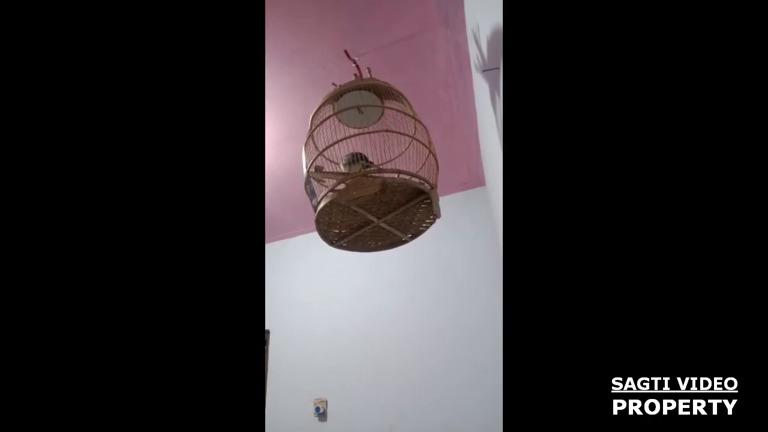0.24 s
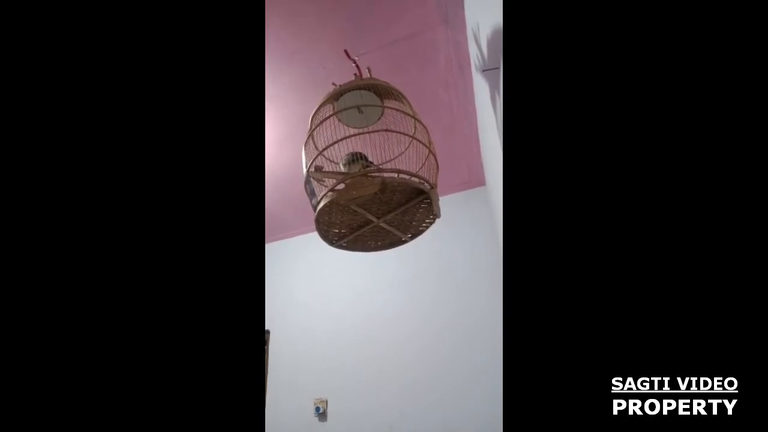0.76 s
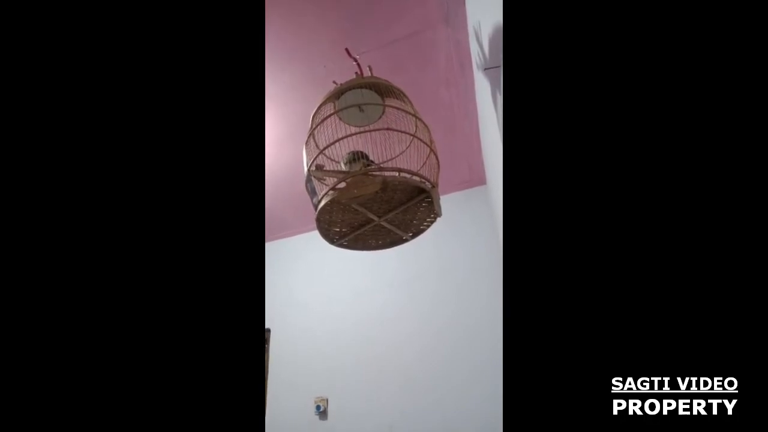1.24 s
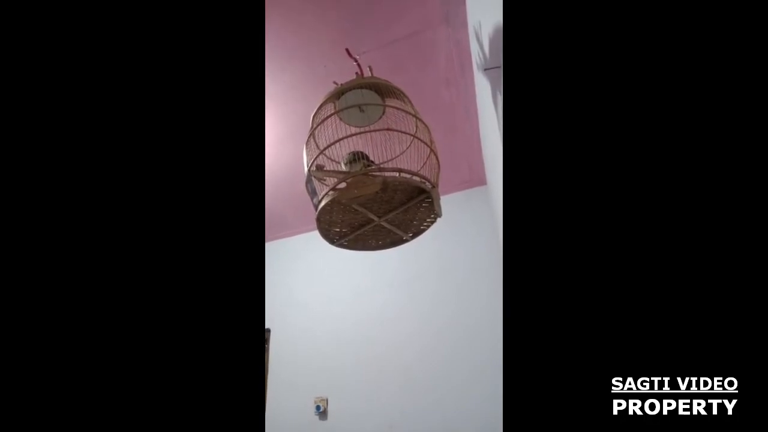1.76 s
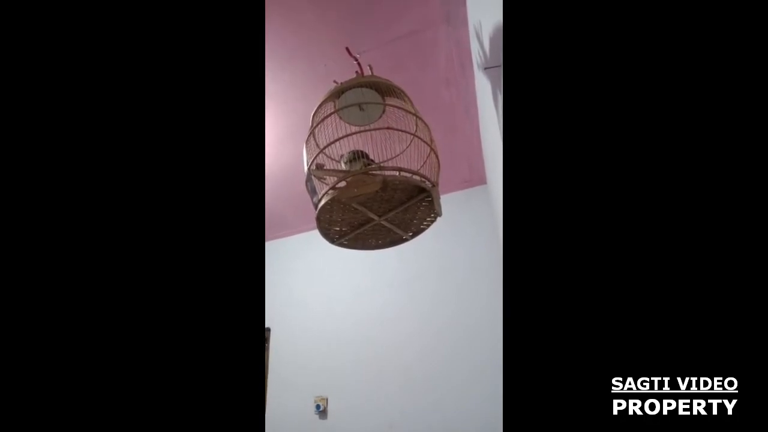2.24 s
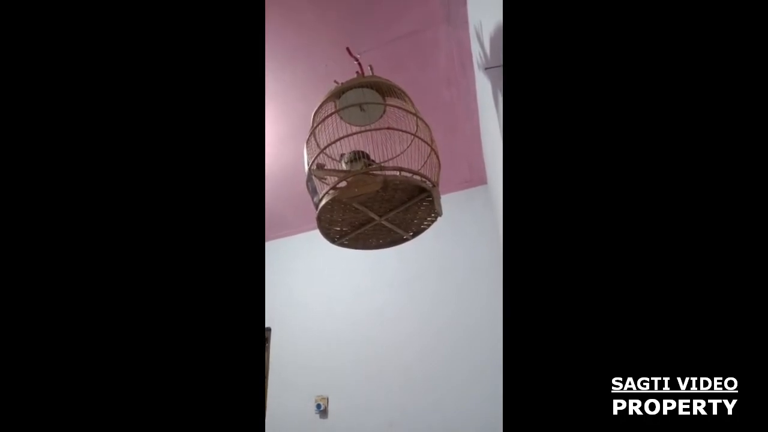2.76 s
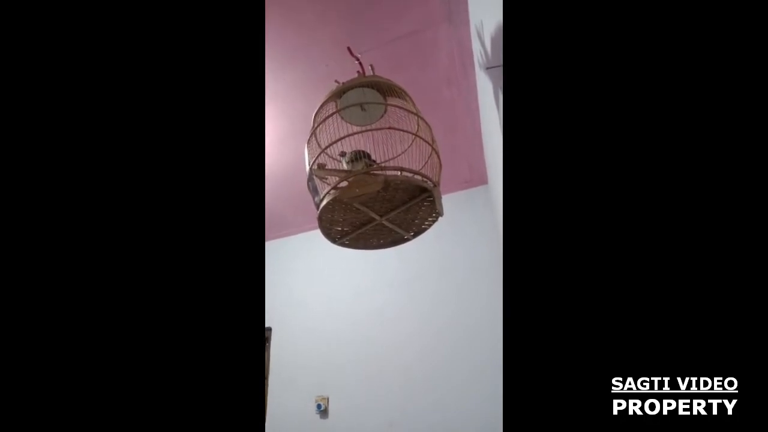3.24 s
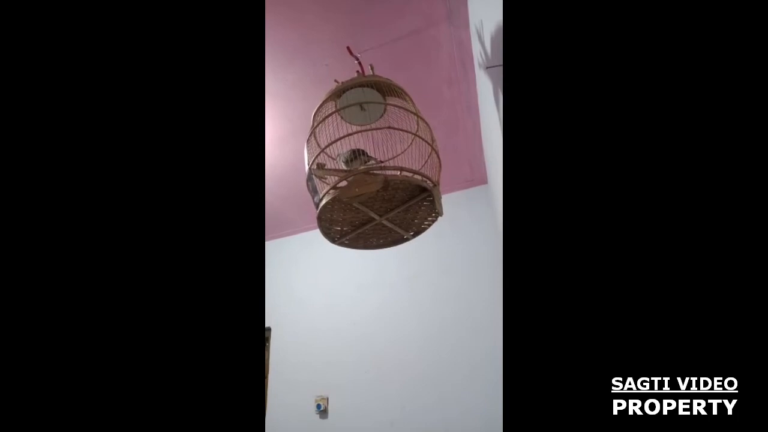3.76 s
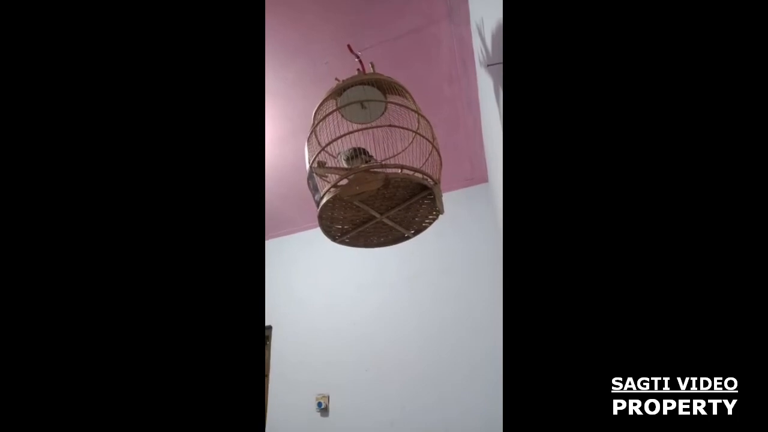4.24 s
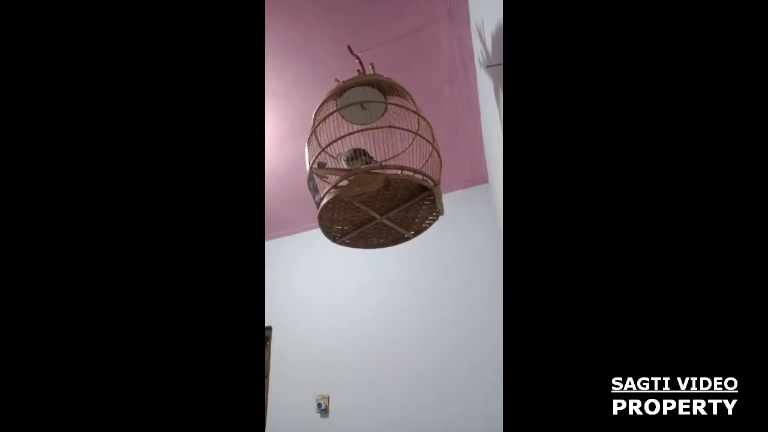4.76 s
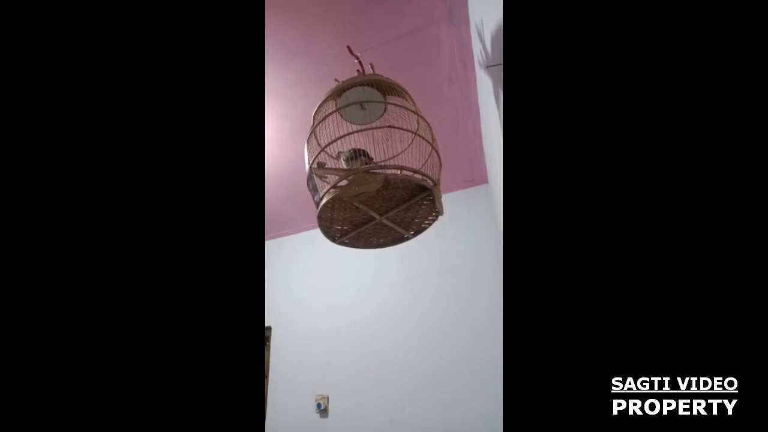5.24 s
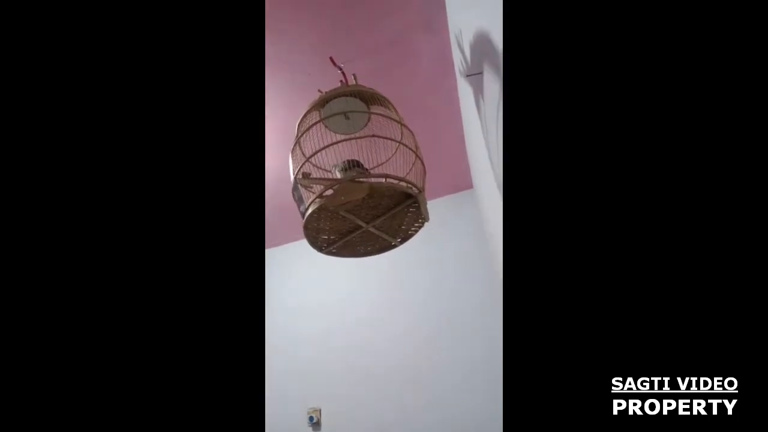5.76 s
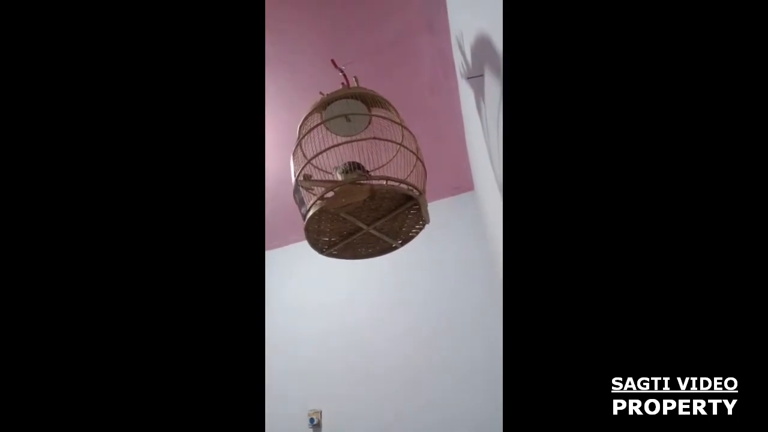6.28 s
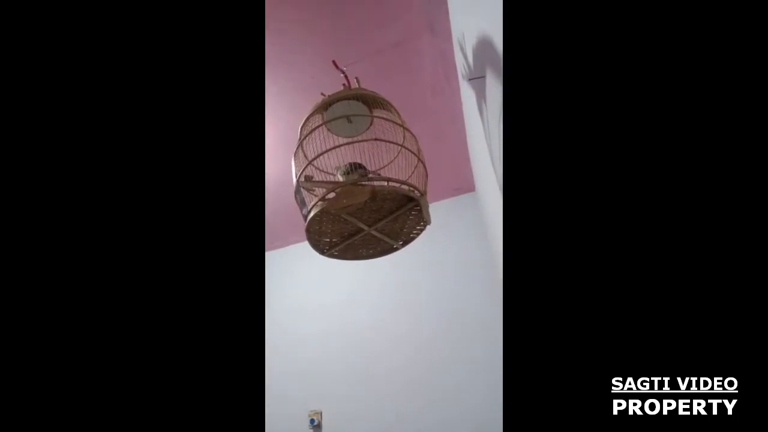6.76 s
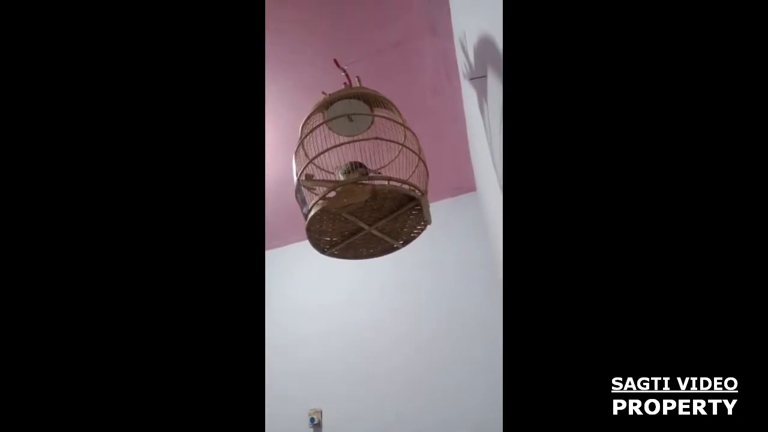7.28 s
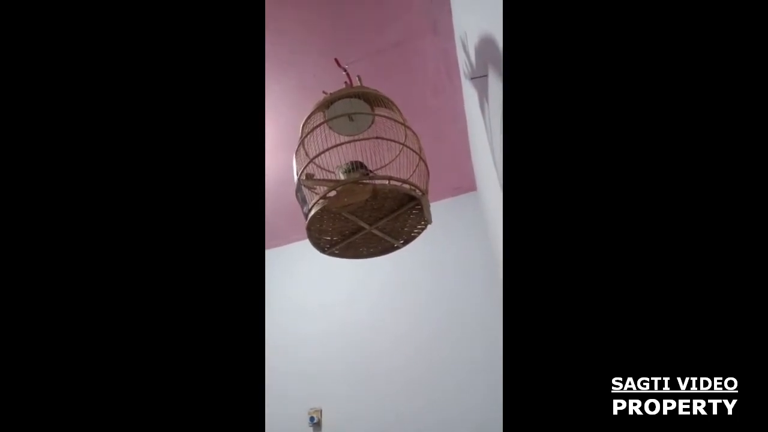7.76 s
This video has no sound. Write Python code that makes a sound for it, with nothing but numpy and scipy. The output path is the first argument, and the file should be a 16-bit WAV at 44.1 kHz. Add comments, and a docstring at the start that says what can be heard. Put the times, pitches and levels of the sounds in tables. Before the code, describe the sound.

In a bare room with ringing walls, a caged dove rustles and gives one quiet coo. A few seconds later it calls loudly with a quick, fluttering roll that trails into softer notes, then gives a shorter loud rolling coo near the end. Small ticks and soft knocks come from the cane cage. The microphone also picks up a faint steady hiss and low room rumble.

```python
"""A bare, echoing room: a dove in a hanging cane cage coos three times.
Slack syrinx membranes rattle and rasp, then snap tight, so each note swoops up into a nearly pure
tone, filtered by the swollen throat. The two loud coos roll in quick notes; the second side of the
syrinx adds a lower, fluttering voice. The bird ticks, rustles and bumps on its perch over a faint
hiss, a low rumble and a far tone that sinks and fades."""
import sys
import numpy as np
from scipy import signal
from scipy.fft import rfft, irfft, next_fast_len
from scipy.io import wavfile
from scipy.ndimage import uniform_filter1d, minimum_filter1d

SR = 44100
rng = np.random.default_rng(int(sys.argv[2]) if len(sys.argv) > 2 else 0)


def digitize_waveform(pressure):
    """Quantize a signal to 16-bit integers and store it at the path in sys.argv[1].

    Rows of a 2-D input are taken as channels; values are limited to [-1, 1].
    """
    field = np.atleast_2d(pressure).T
    bounded = np.clip(field, -1, 1)
    quanta = np.round(bounded * 32767).astype(np.int16)
    wavfile.write(sys.argv[1], SR, quanta)


N = 353417


# Drawn-out notes: catch t/s, swoop/s, length/s, top f/Hz, sag/Hz, effort/dB, fade/dB
LONG_NOTES = [(.695, 0.1, 0.25, 1168, 167, -21.5, -9), (1.133, .028, 0.06, 1013, 43, -24.5, -16),
              (1.273, 0.028, .13, 1085, 27, -24, -0.5), (3.779, .042, 0.16, 1324, 75.5, -2, 7),
              (4.429, 0.024, 0.085, 1282, 52, -6, -8), (4.542, 0.017, .235, 1157, 160, -24, -7.5),
              (4.869, .025, 0.061, 927, 16, -28, -9.5), (5.002, 0.028, 0.14, 1047, 37, -24.5, -15),
              (6.823, .036, .17, 1305, 62, -3, -4), (7.341, 0.018, 0.073, 1254, 14, -3, -21.5)]

def coos(slack_hz=492.4, rattle_hz=766.6, snap_share=0.4, crest_s=0.06):
    """Membranes start slack, rattle and snap tight; past the crest, pitch sags before effort."""
    out = np.zeros(N)
    for s, swoop_s, length, top_hz, sag_hz, effort_db, fade_db in LONG_NOTES:
        t = np.linspace(0, length, 13)
        crest = min(crest_s, length / 2)
        to_crest = np.clip(1 - t / crest, 0, 1)
        past_crest = np.clip((t - crest) / (length - crest), 0, 1)
        hz = top_hz * (1 - 0.055 * to_crest ** 2) - sag_hz * past_crest ** 1.5
        db = effort_db - 0.5 * to_crest + fade_db * past_crest ** 2.6
        swoop = [(s - swoop_s, slack_hz, effort_db - 22),
                 (s - snap_share * swoop_s, rattle_hz, effort_db - 9.5)]
        contour = swoop + list(zip(s + t, hz, db))
        add(out, *syrinx(contour, flutter=0.03, slack_jitter=0.06, rasp_db=-45.5,
                         slack_rasp_db=-6 + 0.34 * effort_db, overtone_db=-3))
    return out


# Quick notes: catch t/s, length/s, top f/Hz, effort/dB
ROLL_NOTES = [(3.957, 0.02, 1224, -1), (4.019, 0.04, 1185, -6.5), (4.089, 0.021, 1170, -6),
              (4.163, 0.029, 1198, -3.5), (4.259, 0.046, 1233, -3), (7.006, 0.033, 1243, -5.5),
              (7.068, 0.027, 1186, -5), (7.142, 0.021, 1177, -6), (7.227, 0.028, 1203, -4)]

def roll(swoop_s=0.017, slack_hz=714, flat_ratio=0.978):
    """Each quick note swoops up from slack and makes one small, dying arch."""
    out = np.zeros(N)
    for s, length, top_hz, effort_db in ROLL_NOTES:
        contour = [(s - swoop_s, slack_hz, effort_db - 18.5),
                   (s, top_hz * flat_ratio, effort_db),
                   (s + length / 2, top_hz, effort_db - 2),
                   (s + length, top_hz * flat_ratio, effort_db - 12)]
        add(out, *syrinx(contour, flutter=0.033, slack_jitter=0.05, rasp_db=-41,
                         slack_rasp_db=-6, overtone_db=-3.5))
    return out


# Lower voice: t/s, length/s, f/Hz, glide/Hz, effort/dB, fade/dB
LOW_NOTES = [(.672, 0.14, 870.4, 7, -11, -26), (.925, 0.12, 874, -115, -17.5, -5),
             (1.12, 0.056, 792, 84, -18.5, -5.5), (1.255, 0.083, 817, 40, -15, -31),
             (3.778, 0.11, 1010, 41, -14.5, -23), (4.42, .016, 987, 80, -8, -18),
             (4.48, 0.038, 856, 4, -13.5, -11), (4.71, .13, 876.5, -98.5, -22, 2),
             (4.872, 0.044, 857.4, -17, -17, -21), (4.972, 0.064, 800.3, 12.5, -21.5, -7.5),
             (6.814, 0.016, 964, -13.5, -8.5, -6.5), (6.836, 0.089, 866, -11.5, -13, -19.5),
             (7.075, .17, 870, -12.5, -22.5, 1.5), (7.338, 0.044, 955, -95, -12, -13)]

def lower_voice(attack_s=0.014, flat_ratio=0.973):
    """The second side of the syrinx starts weak and flat, then glides straight, fluttering."""
    out = np.zeros(N)
    for s, length, hz, glide_hz, effort_db, fade_db in LOW_NOTES:
        contour = [(s - attack_s, hz * flat_ratio, effort_db - 12.5),
                   (s, hz, effort_db),
                   (s + length, hz + glide_hz, effort_db + fade_db)]
        add(out, *syrinx(contour, flutter=0.35, slack_jitter=0.038, rasp_db=-38.5,
                         slack_rasp_db=-35, overtone_db=-22.5))
    return out


# Passband of the swollen crop and throat: f/Hz, gain/dB
THROAT = [(200, -32.5), (320, -17.5), (480, -27.5), (720, -11.5), (900, -1), (1300, -3.5), (1480, -5),
          (1850, -16.5), (2150, -19), (2550, -17.5), (3100, -14.5), (3800, -20.5), (4200, -37),
          (4900, -41.5), (6300, -40.5), (7400, -28), (8300, -45), (9100, -40.5), (12000, -49.5)]

def syrinx(contour, flutter, slack_jitter, rasp_db, slack_rasp_db, overtone_db,
           clear_hz=1080, slack_hz=700, fade_s=0.004):
    """Membranes rasp when slack, sing when tight. Contour: t/s, f/Hz, effort/dB. Gives start, sound."""
    s, pitch, effort = np.transpose(contour)
    size = SR // 2
    t = np.arange(s[0], s[-1] + fade_s, 1 / SR)[:size]
    hz = np.interp(t, s, pitch)
    effort_db = np.interp(t, s, effort)
    slack = np.clip((clear_hz - hz) / (clear_hz - slack_hz), 0, 1)
    hz *= 1 + (0.0015 + slack_jitter * slack) * wander(size, 190)[:len(t)]
    phase = 2 * np.pi * np.cumsum(hz) / SR
    tone = gain_of(read(THROAT, hz)) * np.sin(phase)
    for k in range(2, 11):
        dull_db = -26 * slack * (k > 2)
        harmonic_db = read(THROAT, k * hz) + overtone_db - 8 * np.log2(k) + dull_db
        tone += gain_of(harmonic_db) * np.sin(k * phase)
    weak = np.clip((-16 - effort_db) / 10, 0, 1)  # weak drive swings unevenly
    tone *= 1 + (flutter + 0.066 * weak) * wander(size, 170)[:len(t)]
    air_spectrum = [(f, db - 16 * np.log2(max(f / 1600, 1))) for f, db in THROAT]
    air = noise(air_spectrum, size)[:len(t)]  # rushing past the membranes
    rasp = air * (gain_of(rasp_db) + gain_of(slack_rasp_db) * slack)
    edge_s = np.minimum(t - t[0], t[-1] - t)
    fade = np.sin(np.pi / 2 * np.clip(edge_s / fade_s, 0, 1)) ** 2
    return s[0], gain_of(effort_db) * fade * (tone + rasp)


# Brushes on the cane: t/s, relative level/dB, decay/s
RUSTLES = [(.233, -44, .012), (.332, -54, .015), (.426, -45.5, .016), (.588, -58, 0.011), (.835, -51, .012),
           (.861, -44.5, .025), (3.682, -49.5, .008), (7.008, -52.5, .008), (7.283, -43, .008)]
# Rustle spectrum: f/Hz, level/dB
RUSTLE_SPECTRUM = [(300, -20.5), (1500, -5), (3000, 2), (4200, -9.5), (5600, -25), (8300, -5), (11000, -18),
                   (15000, -14)]

def rustles():
    """Feathers and claws brush the cane."""
    out = np.zeros(N)
    for s, db, decay_s in RUSTLES:
        add(out, s, gain_of(db) * burst(RUSTLE_SPECTRUM, decay_s, rise_s=0.00034))
    return out


# Perch contacts: t/s, relative level/dB, decay/s, centre f/Hz, width/octaves
BUMPS = [(.43, -44, 0.024, 413, 0.47), (.427, -67, 0.0084, 2800, 0.56), (.859, -34.5, 0.01, 2550, 0.34),
         (1.039, -45, 0.048, 145, 0.19), (3.689, -47.5, 0.049, 1000, 0.58),
         (4.595, -38.5, 0.016, 360, 0.99), (4.753, -42.5, 0.046, 340, 0.99),
         (4.794, -51.5, 0.0099, 250, 0.98), (5.179, -45, 0.013, 320, 0.34),
         (5.184, -42.5, 0.024, 2350, 0.11), (6.743, -44.5, 0.061, 1000, 0.47)]

def perch_bumps():
    """The bird knocks and scrapes softly on its perch, one noise band per contact."""
    out = np.zeros(N)
    for s, db, decay_s, hz, octaves in BUMPS:
        band = [(hz * 2 ** (k * octaves), -4 * k * k) for k in np.arange(-4, 5)]
        add(out, s, gain_of(db) * burst(band, decay_s, rise_s=0.0012))
    return out


# Cage ticks: t/s, relative level/dB, f/Hz, length/s
TICKS = [(3.484, -31, 3000, 0.0014), (3.487, -33, 3800, 0.0027), (3.488, -51.5, 4660, 0.0033),
         (6.512, -20.5, 3000, 0.0035), (6.513, -48.5, 3950, 0.0048)]

def cage_ticks():
    """The cage ticks in sharp pulses a few cycles long."""
    out = np.zeros(N)
    for s, db, hz, length in TICKS:
        t = np.arange(0, length, 1 / SR)
        window = np.sin(np.pi * t / length) ** 2
        add(out, s, gain_of(db) * window * np.sin(2 * np.pi * hz * t))
    return out


# Tail decay: f/Hz, T60/s
ROOM_T60 = [(200, 0.44), (700, 0.53), (1030, 0.6), (1350, 0.33), (3000, 0.39), (8000, 0.072), (15000, 0.07)]
# Near-wall echoes: delay/s, relative level/dB
WALL_ECHOES = [(.0037, -8.5), (.0066, -7), (0.0173, -8), (0.0203, -10.5), (.0405, -9.5)]
# Resonances of the cage's corner: f/Hz, T60/s, level/dB
CORNER_MODES = [(852, 0.52, -8), (990, 0.84, -0.5), (1030, 0.15, 3), (1177, 0.36, -15), (1431, 0.12, 7),
                (1570, 0.17, 1.5)]
# Echo cancellations: f/Hz, width/Hz, gain/dB
ECHO_DIPS = [(868, 84, -1.5), (1404, 18, -9), (6400, 34, -7.5), (6700, 160, -8.5)]

def room(x, tail_db=-2, build_s=0.0034):
    """Direct sound, wall echoes and a diffuse tail, all coloured by the corner."""
    t = np.arange(SR) / SR
    bands_hz, times, frames = signal.stft(rng.standard_normal(SR), SR, nperseg=256)
    decay = gain_of(-60 * times / read(ROOM_T60, bands_hz)[:, None])
    tail = signal.istft(frames * decay, SR, nperseg=256)[1][:SR]
    tail *= 1 - np.exp(-t / build_s)
    response = gain_of(tail_db) * tail / np.linalg.norm(tail)
    response[0] += 1
    for delay, db in WALL_ECHOES:
        add(response, delay, gain_of([db]))
    # Minimum-phase EQ: equal energy per band, fine ripple kept.
    hz, spectrum = np.fft.rfftfreq(SR, 1 / SR), rfft(response)
    power = smooth(abs(spectrum) ** 2, 60)
    cepstrum = irfft(-np.log(power) / 2)
    causal = np.r_[1, np.full(SR // 2 - 1, 2), np.zeros(SR // 2)]
    colour = np.exp(rfft(cepstrum * causal))
    colour *= 1 + sum(gain_of(db) / (1 + 2j * np.pi * (hz - f) * t60 / np.log(1000))
                      for f, t60, db in CORNER_MODES)
    for f, width, db in ECHO_DIPS:
        colour *= 1 - (1 - gain_of(db)) / (1 + 2j * (hz - f) / width)
    return signal.fftconvolve(x, irfft(spectrum * colour))[:N]


# Hiss spectrum: f/Hz, relative density/dB
HISS_SPECTRUM = [(100, -16.5), (700, -3), (1300, -3.5), (3300, -2), (4000, -8.5), (5500, -32.5),
                 (6800, -31.5), (8300, -21), (11000, -32.5), (15000, -30)]
# Hiss swell: t/s, gain/dB
HISS_SWELL = [(0, 0), (.5, 0), (1.65, 1), (1.9, -3), (2.1, -2), (2.45, 1.5), (2.8, 1), (5.3, 0),
              (5.95, 2.1), (6.3, -2), (7.2, 2.5), (7.9, 0.5)]

def hiss(base_db=-53):
    """Faint hiss that swells, ebbs and wavers."""
    swell_db = np.interp(np.arange(N) / SR, *np.transpose(HISS_SWELL))
    waver_db = wander(N, 8)
    return noise(HISS_SPECTRUM) * gain_of(base_db + swell_db + waver_db)


# Rumble spectrum: f/Hz, relative density/dB
RUMBLE_SPECTRUM = [(25, -14), (48, -15), (70, 0), (125, 0.5), (220, -5.5), (500, -9.5), (1300, -24.5),
                   (3000, -55.5)]

def rumble(level_db=-56):
    """Steady low room noise."""
    return noise(RUMBLE_SPECTRUM) * gain_of(level_db)


# Far tone: t/s, f/Hz, level/dB
FAR_TONE = [(0, 703, -55.5), (.55, 689, -55.5), (0.899, 688, -65.5), (2.6, 679, -64), (3.4, 678, -78)]

def far_tone():
    """A faint, distant sine that sinks and fades."""
    s, hz, db = np.transpose(FAR_TONE)
    t = np.arange(N) / SR
    phase = 2 * np.pi * np.cumsum(np.interp(t, s, hz)) / SR
    return gain_of(np.interp(t, s, db)) * np.sin(phase)


def gain_of(db):
    """Decibels to amplitude."""
    return 10 ** (np.asarray(db) / 20)


def unit_rms(x):
    """Scales to rms 1."""
    return x / np.sqrt(np.mean(x ** 2) + 1e-20)


def smooth(x, size):
    """Two passes of a moving average."""
    return uniform_filter1d(uniform_filter1d(x, size), size)


def read(points, hz):
    """Interpolates on a log-frequency axis."""
    f, value = np.transpose(points)
    return np.interp(np.log(hz + 1), np.log(f), value)


def add(mix, s, sound):
    """Mixes a sound in at time s."""
    part = mix[max(round(s * SR), 0):][:len(sound)]
    part += sound[:len(part)]


def noise(spectrum, size=N):
    """Steady coloured noise, rms 1."""
    padded = next_fast_len(size, True)
    colour = gain_of(read(spectrum, np.fft.rfftfreq(padded, 1 / SR)))
    return unit_rms(irfft(rfft(rng.standard_normal(padded)) * colour, padded)[:size])


def burst(spectrum, decay_s, rise_s):
    """Coloured noise that swells and dies."""
    t = np.arange(SR // 2) / SR
    return (1 - np.exp(-t / rise_s)) * np.exp(-t / decay_s) * noise(spectrum, len(t))


def wander(size, rate_hz):
    """Smooth random motion up to about rate_hz, rms near 1."""
    padded = next_fast_len(size + SR // 10, True)
    lowpass = np.exp(-(np.fft.rfftfreq(padded, 1 / SR) / rate_hz) ** 2)
    return unit_rms(irfft(rfft(rng.standard_normal(padded)) * lowpass, padded))[:size]


def scene(dove_gain_db=1.0, cage_gain_db=2.5):
    """Dove and cage through the room, over the background; mono."""
    dove = coos() + roll() + lower_voice()
    cage = rustles() + perch_bumps() + cage_ticks()
    in_room = room(gain_of(dove_gain_db) * dove + gain_of(cage_gain_db) * cage)
    return (in_room + hiss() + rumble() + far_tone())[None]


def record(dry, ceiling=0.69, cutoff_hz=15550):
    """Smooth peak limiter, then low-pass."""
    headroom = np.minimum(1, ceiling / (abs(dry) + 1e-9))
    gain = smooth(minimum_filter1d(headroom, size=880), 440)
    lowpass = signal.firwin(511, cutoff_hz, window=("kaiser", 9), fs=SR)
    return signal.oaconvolve(dry * gain, lowpass[None], "same")


dry = scene()
out = record(dry)
digitize_waveform(out)
```